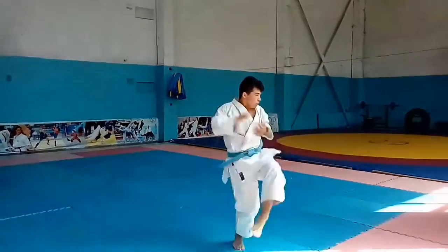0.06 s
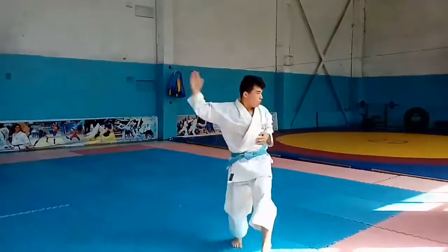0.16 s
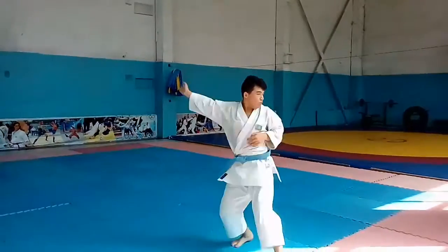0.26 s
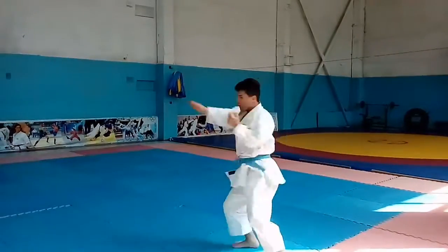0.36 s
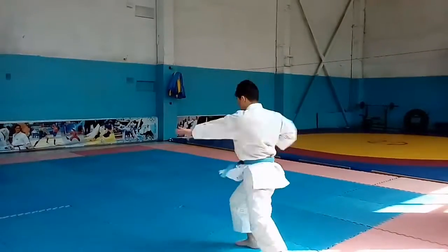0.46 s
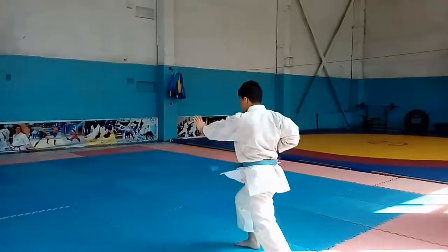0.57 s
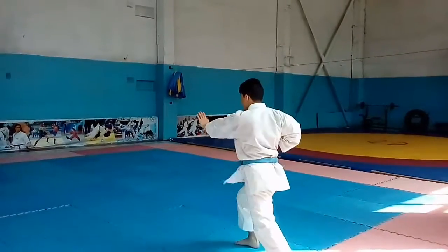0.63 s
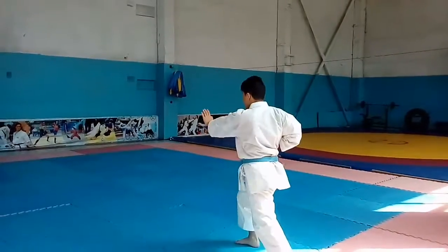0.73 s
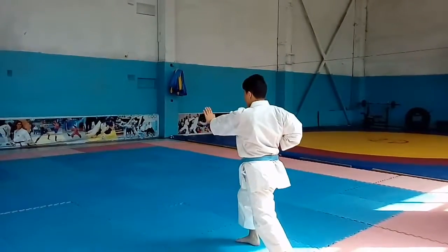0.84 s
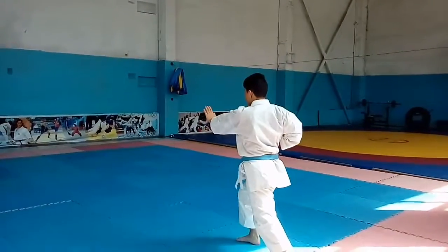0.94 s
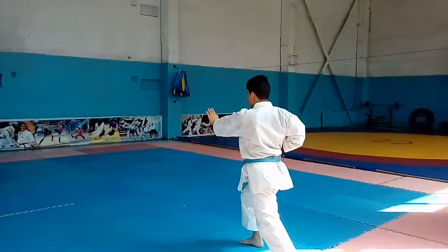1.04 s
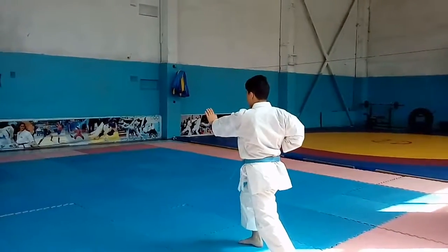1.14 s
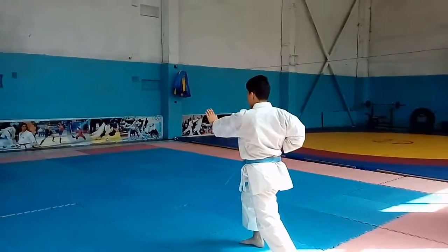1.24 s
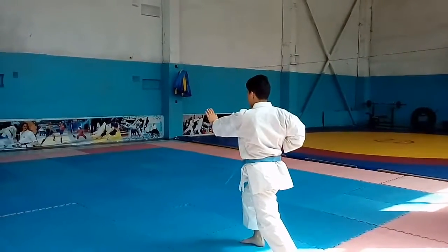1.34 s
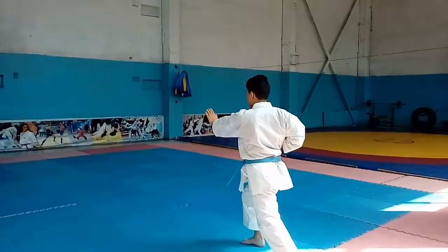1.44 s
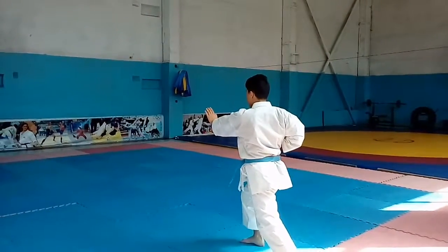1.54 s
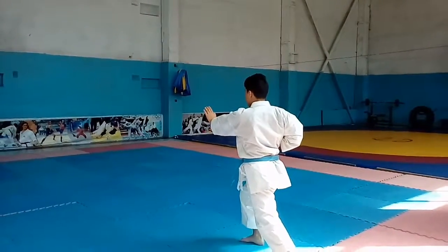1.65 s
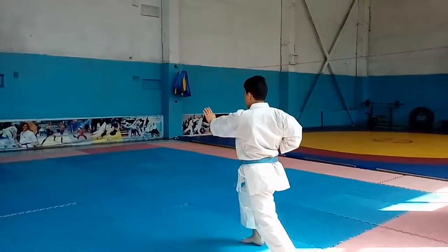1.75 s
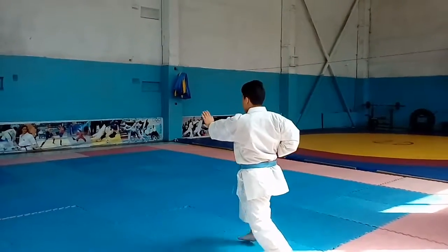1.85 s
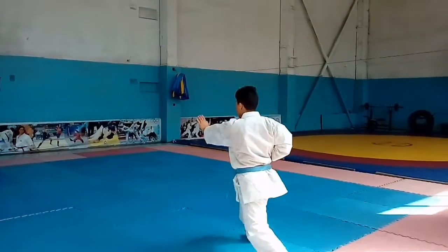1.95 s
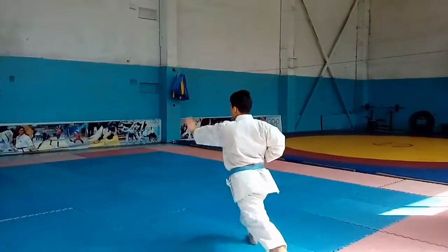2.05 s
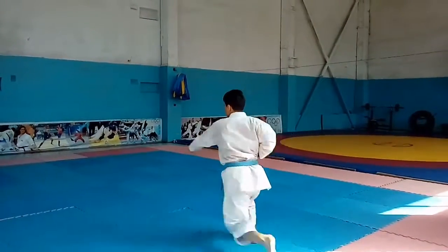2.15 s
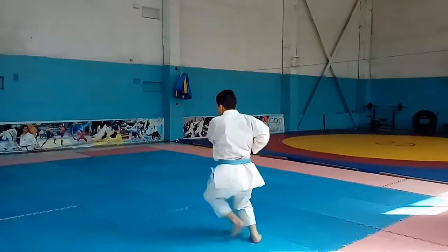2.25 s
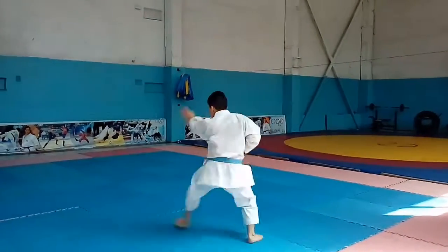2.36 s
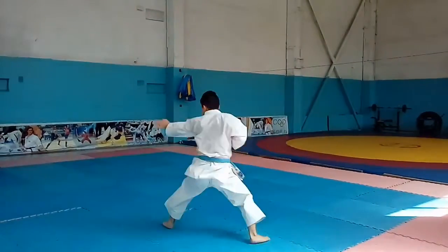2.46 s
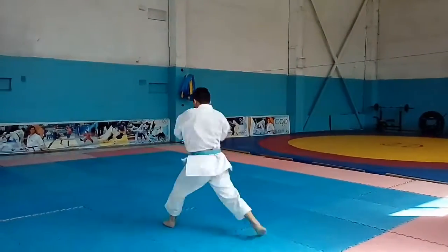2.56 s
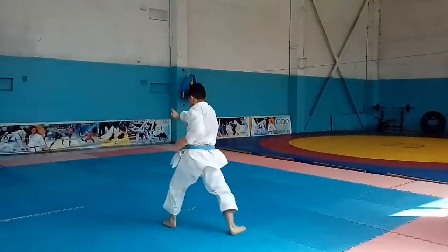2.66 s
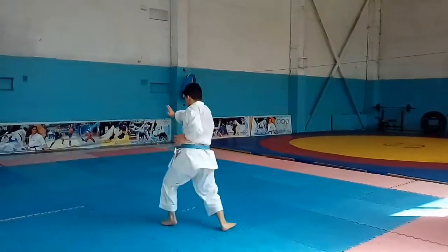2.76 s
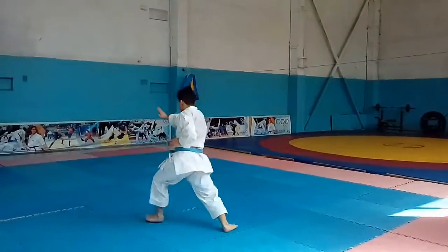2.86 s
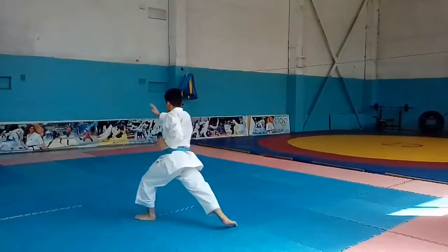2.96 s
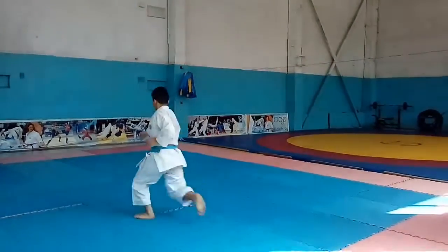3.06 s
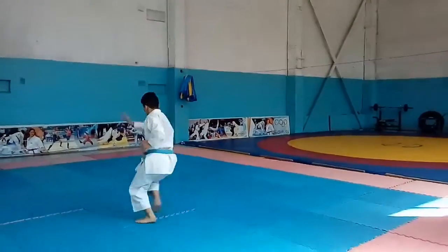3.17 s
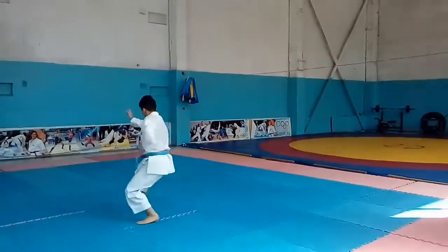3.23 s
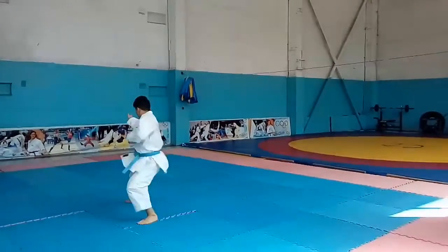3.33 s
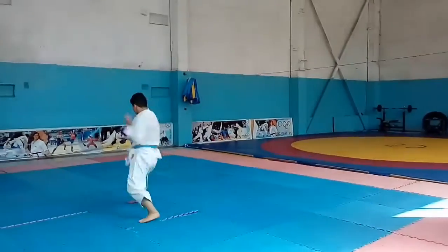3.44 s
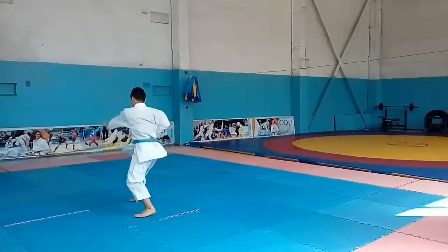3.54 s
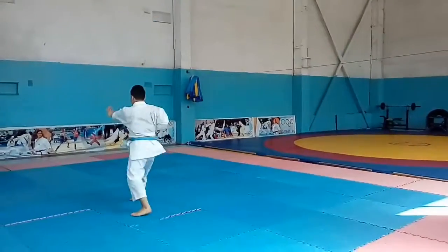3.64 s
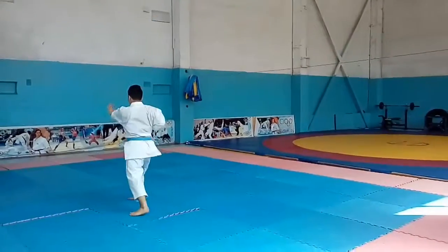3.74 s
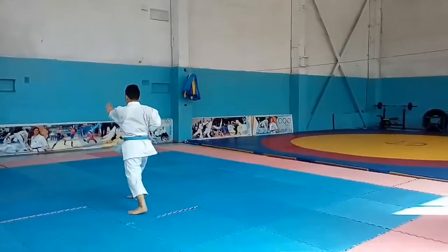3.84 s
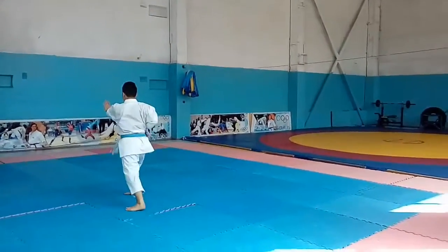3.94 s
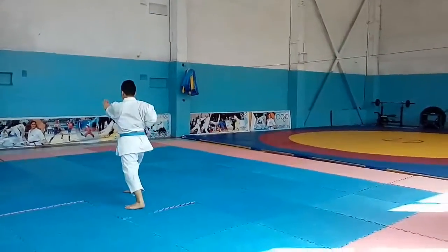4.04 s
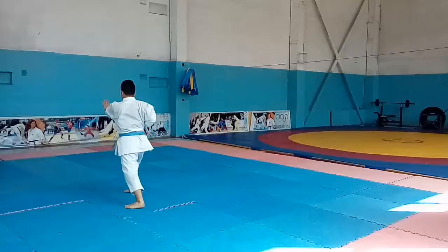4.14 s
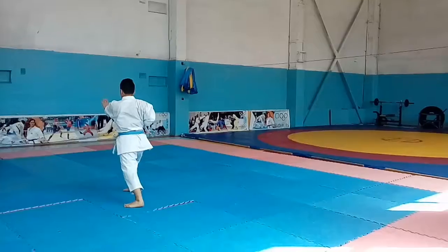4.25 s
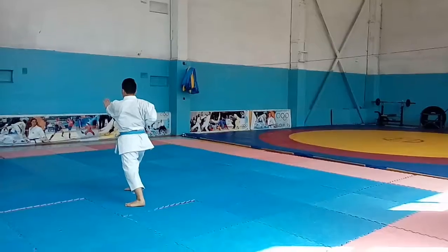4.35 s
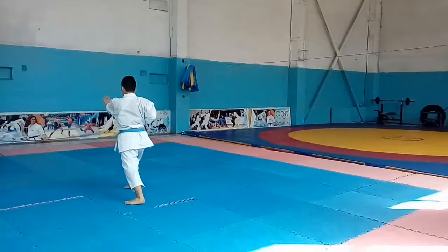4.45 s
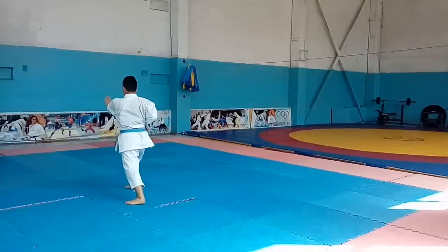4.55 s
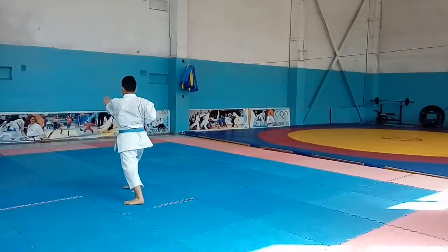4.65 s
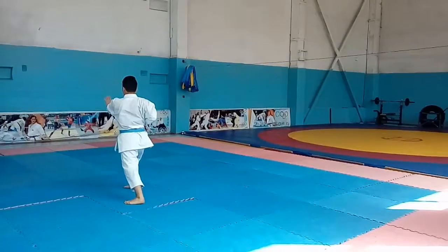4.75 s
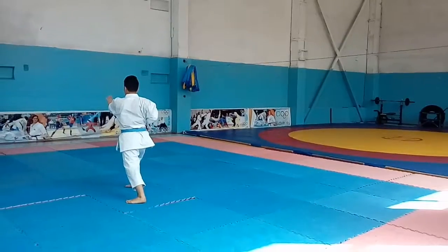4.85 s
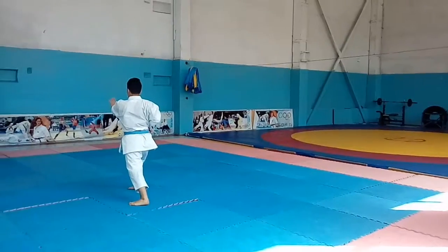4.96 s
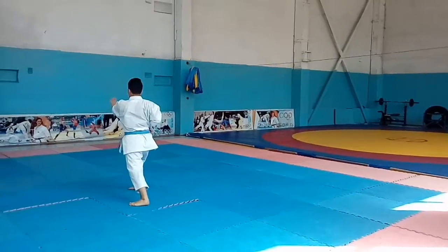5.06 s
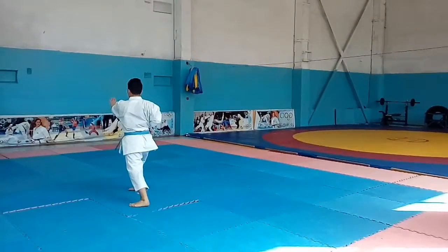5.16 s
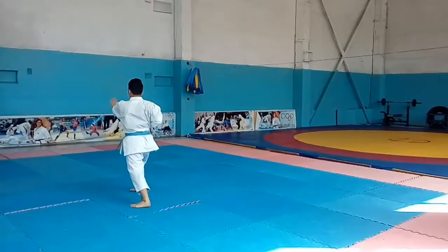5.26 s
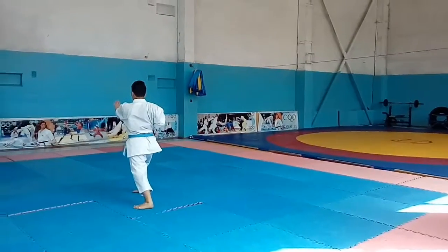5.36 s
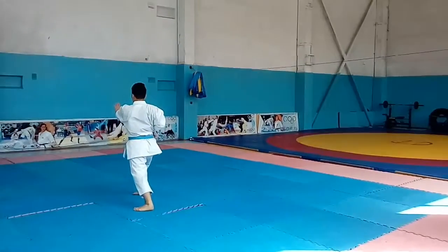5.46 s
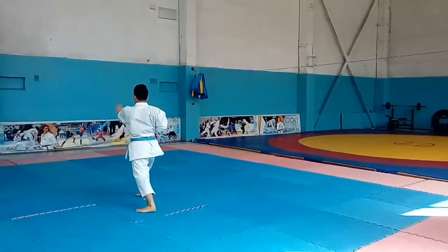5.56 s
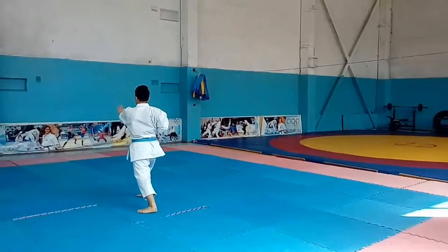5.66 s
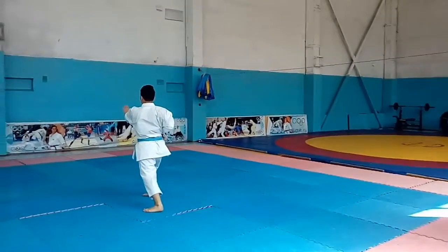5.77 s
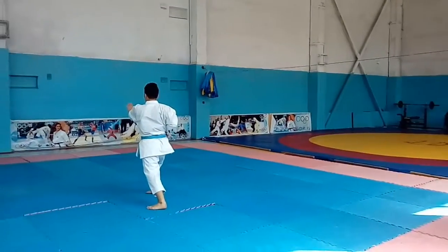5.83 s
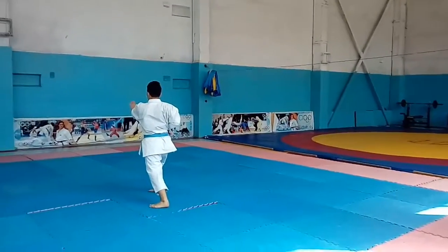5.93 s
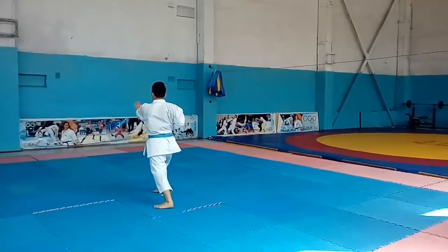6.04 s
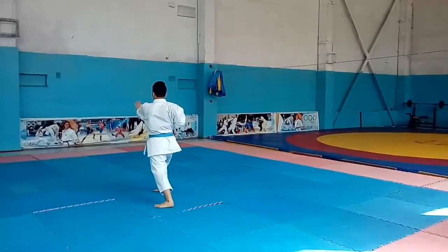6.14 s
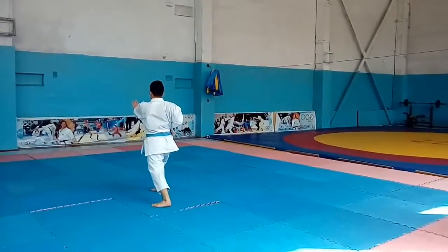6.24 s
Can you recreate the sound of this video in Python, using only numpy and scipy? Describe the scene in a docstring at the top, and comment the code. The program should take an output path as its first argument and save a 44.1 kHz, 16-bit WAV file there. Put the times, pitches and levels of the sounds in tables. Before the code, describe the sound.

Heavy cotton uniform snaps sharply in fast strikes, bare feet thud and skid on foam mats, each crack ringing through a big hard-walled hall.

```python
"""A karateka runs through a form on foam mats in a large, hard-walled sports hall.
The hall still rings at the start as two strikes come quickly; after a pause come steps, skids and a
third strike, then a fourth, and at last only faint swishes. Cotton rubs as shaped noise, snaps taut as short
bursts with an air pop, bare feet thud as low decaying noise and skid as two hiss bands. He faces away, so his
body shades the big snaps; an echo response and a delayed wall bloom throw them back louder and brighter."""
import sys
import numpy as np
from scipy import signal
from scipy.fft import rfft, irfft, next_fast_len
from scipy.io import wavfile
from scipy.ndimage import uniform_filter1d

SR = 44100
rng = np.random.default_rng(int(sys.argv[2]) if len(sys.argv) > 2 else 0)


def store_pcm(level_fs):
    """Save levels as 16-bit WAV."""
    pcm = np.round(np.clip(level_fs, -1, 1) * 32767).astype(np.int16)
    wavfile.write(sys.argv[1], SR, np.atleast_2d(pcm).T)


N = 277830

# spectrum of cloth pulled taut: frequency_hz, density_db (dB per Hz)
CLOTH_SPECTRUM = [(40, -20.5), (150, -15.5), (300, -14.5), (450, -6.5), (600, 3.5), (780, 1), (1000, -3.5),
                  (1500, -2.5), (3000, -6.5), (6700, -7.5), (8000, -20), (11000, -31.5), (16000, -49.5)]
# spectrum of cotton rubbing on cotton: frequency_hz, density_db (dB per Hz)
RUB_SPECTRUM = [(40, -31.5), (200, -25), (400, -8), (520, -1), (620, -1), (800, 3), (1020, -3), (1550, -4),
                (2700, -8), (4200, -9), (6600, -7), (7400, -12.5), (8100, -19.5), (11000, -29),
                (16000, -42.5)]


def amp(db):
    """Amplitude ratio: 20 dB is a factor of ten."""
    return 10 ** (np.asarray(db) / 20)


def unit(x):
    """Normalisation of signal power: scales to rms 1."""
    return x / np.sqrt(np.mean(x ** 2) + 1e-20)


def read(points, hz):
    """Logarithmic frequency scale: interpolates a table along it."""
    f, value = np.transpose(points)
    return np.interp(np.log(hz + 1), np.log(f + 1), value)


def octaves(hz, centre_hz, low_hz, high_hz):
    """Musical interval from the centre in octaves, held level outside the range."""
    return np.log2(np.clip(hz, low_hz, high_hz) / centre_hz)


def slope(hz):
    """Spectral tilt: the octaves over which cloth sounds brighten or dull."""
    return octaves(hz, 1500, 750, 7000)


def colour(x, curve):
    """Linear filtering: weights the spectrum by a dB curve, given as a function of Hz."""
    hz = np.fft.rfftfreq(len(x), 1 / SR)
    return irfft(rfft(x) * amp(curve(hz)), len(x))


def add(mix, s, sound):
    """Superposition: mixes a sound in from time s, in seconds."""
    start = round(s * SR)
    sound = sound[max(-start, 0):]
    part = mix[max(start, 0):][:len(sound)]
    part += sound[:len(part)]


def crackle(count, grain_db):
    """Stick-slip of fibres and creases: noise in tiny grains of uneven loudness."""
    grain_samples = 32
    sizes = np.repeat(rng.standard_normal(count // grain_samples + 1), grain_samples)[:count]
    return unit(rng.standard_normal(count) * amp(grain_db * np.clip(sizes, -2, 2)))


def hiss(size, centre_hz, width):
    """Band-limited friction: grainy noise, 6 dB down at width octaves either side of the centre."""
    def band(hz):
        distance = np.log2((hz + 1) / centre_hz) / width
        return -20 * np.log10(1 + distance ** 2)
    return unit(colour(crackle(size, grain_db=3.5), band))


def smear(t, length):
    """Phase scattering: a short noise burst, evened out so that it holds every frequency equally."""
    z = rfft(rng.standard_normal(len(t)) * np.exp(-(t / length) ** 2))
    return irfft(z / (abs(z) + 1e-20), len(t))


def quiet_air(level_db=-58):
    """Stationary background: steady noise with the spectrum of the quiet hall."""
    # frequency_hz, density_db (dB per Hz)
    air_spectrum = [(20, -9), (60, -6.5), (150, -13.5), (300, -11), (550, -7.5), (1100, -4.5), (2000, -6.5),
                    (3500, -9.5), (6700, -9), (8200, -24.5), (13800, -24.5), (14700, -16.5), (16000, -6)]
    return amp(level_db) * unit(colour(rng.standard_normal(N), lambda hz: read(air_spectrum, hz)))


def hall_tail(build_s=0.046, first_s=0.01):
    """Reverberation: dense reflections build up after a gap, each band dying at its own speed."""
    # decay time of the hall: frequency_hz, t60_s
    decay_times = [(60, 4.05), (160, 2.04), (350, 2.26), (600, 2.86), (1100, 2.13), (1700, 2.96),
                   (2600, 2.79), (4500, 2.49), (6500, 1.74), (8000, 1.32), (10000, 0.6), (15000, 0.37)]
    count = 3 * SR
    hz, t, z = signal.stft(rng.standard_normal(count), SR, nperseg=512)
    fade = amp(-60 * t / read(decay_times, hz)[:, None])
    tail = signal.istft(z * fade, SR)[1][:count]
    tail *= np.clip((np.arange(count) / SR - first_s) / build_s, 0, 1) ** .5
    # mean power gain 1 between 500 and 4500 Hz
    middle = colour(tail, lambda hz: np.where((hz > 500) & (hz < 4500), 0, -200))
    return tail / np.linalg.norm(middle) * np.sqrt(8000 / SR)


def hall(x):
    """Impulse response: convolves with single wall and roof echoes on top of the long tail."""
    # early reflections: delay_s, gain (amplitude ratio)
    early_echoes = [(.034, 0.095), (0.041, 0.063), (.049, 0.11), (0.057, 0.084), (.063, 0.15), (.072, 0.15),
                    (.089, 0.072), (.108, 0.11)]
    response = hall_tail()
    for delay, gain in early_echoes:
        response[round(delay * SR)] += gain
    return signal.fftconvolve(x, response)[:N]


def lingering(level_db=-33, tilt=-1):
    """Free decay: the hall is still ringing from the strike before; tilt in dB/octave."""
    late_tail = hall_tail()[SR // 4:]
    tail = colour(late_tail, lambda hz: read(CLOTH_SPECTRUM, hz) + tilt * octaves(hz, 1500, 500, 7000))
    out = np.zeros(N)
    # the level is that of the first tenth of a second
    add(out, 0, amp(level_db) * tail[:2 * SR] / np.std(tail[:SR // 10]))
    return out


def whooshes(size=16384, width_octaves=.28):
    """Narrow-band noise under a Gaussian envelope: whooshes and thin flicks of loose cloth."""
    # peak_s, level_db, half_length_s, centre_hz
    whoosh_table = [(2.291, -55, .03, 13400), (3.175, -63, 0.011, 14200), (3.69, -35.5, .024, 1180),
                    (4.937, -56.5, 0.063, 1205), (5.728, -67, 0.063, 3200)]
    out, t = np.zeros(N), (np.arange(size) - size // 2) / SR
    for s, db, length, centre_hz in whoosh_table:
        swell = np.exp(-(t / length) ** 2)
        add(out, s + t[0], amp(db) * hiss(size, centre_hz, width_octaves) * swell)
    return out


def skids(size=16384):
    """Sliding friction: bare skin dragging over the embossed foam hisses in two narrow bands."""
    # peak_s, level_db, half_length_s, upper_over_lower_db
    skid_table = [(1.971, -45.5, 0.052, 2), (2.133, -43.5, 0.053, 0.5), (2.207, -43.5, 0.056, -12.5),
                  (2.27, -40, .028, 8), (2.567, -39, 0.066, 0), (2.641, -45.5, 0.017, 16),
                  (2.718, -38.5, 0.042, 8.5), (3.426, -40.5, 0.011, 16.5)]
    # lower and upper hiss band of skin on foam: centre_hz, width_octaves
    sole_bands = [(3270, 0.22), (5900, 0.24)]
    out, t = np.zeros(N), (np.arange(size) - size // 2) / SR
    for s, db, length, upper_db in skid_table:
        lower, upper = [hiss(size, *band) for band in sole_bands]
        swell = np.exp(-(t / length) ** 2)
        add(out, s + t[0], amp(db) * unit(lower + amp(upper_db) * upper) * swell)
    return out


def steps(attack_s=0.0071):
    """Impact excitation: a heel pushes the mat and the floor under it booms briefly."""
    # feet landing: start_s, level_db, decay_s, tilt_db_per_octave
    step_table = [(0.02, -44.5, 0.032, 8), (0.169, -52, 0.092, 3), (0.421, -35.5, 0.038, 10),
                  (0.649, -51, 0.067, 1), (2.149, -47.5, 0.021, 4), (2.293, -48.5, 0.059, 12),
                  (2.599, -46.5, 0.09, -3.5), (2.738, -41, 0.024, 1), (2.828, -34, 0.079, -9.5),
                  (3.491, -45, 0.088, 6.5), (3.678, -49, 0.028, -5)]
    # spectrum of the struck mat: frequency_hz, density_db (dB per Hz)
    mat_spectrum = [(20, -19.5), (35, -13.5), (48, -16.5), (60, -14), (75, 2.5), (95, -6), (135, -7.5),
                    (200, -19), (400, -22), (1500, -50.5), (6000, -76)]
    out, t = np.zeros(N), np.arange(SR // 2) / SR
    for s, db, decay, tilt in step_table:
        thud = colour(rng.standard_normal(len(t)),
                      lambda hz: read(mat_spectrum, hz) + tilt * octaves(hz, 80, 40, 160))
        shape = (1 - np.exp(-t / attack_s)) * np.exp(-t / decay)
        add(out, s, amp(db) * unit(thud * shape) * np.sqrt(np.mean(shape ** 2)))
    return out


def boom(x, boom_hz=75, t60_s=1.5, boom_db=-3):
    """Modal resonance: steps set the wooden floor under the mats humming at one low pitch."""
    t = np.arange(2 * SR) / SR
    mode = np.sin(2 * np.pi * boom_hz * t) * np.exp(-np.log(1000) * t / t60_s)
    hum = signal.fftconvolve(x, mode / np.linalg.norm(mode))[:N]
    # the level refers to input noise 50 Hz wide
    return amp(boom_db) * hum * np.sqrt(100 / SR)


def sweeps(t):
    """Speed-dependent friction: level (dB) and tilt at times t; sweeps are brightest at top speed."""
    # limbs sweeping through jacket and trousers: top_speed_s, level_db, half_length_s, tilt_db_per_octave
    sweep_table = [ (0.01, -41, 0.12, 4.5), (0.099, -31, .035, 0), (0.447, -34.5, 0.046, -0.5),
                   (0.602, -28.5, 0.085, 2), (1.955, -47, 0.037, 3.5), (2.151, -38.5, 0.048, 3),
                   (2.266, -34, 0.045, 4), (2.452, -43.5, 0.089, -1.5), (2.553, -38, 0.073, 1.5),
                   (2.716, -35, 0.0296, -2), (3.172, -33, 0.02, 1), (3.432, -37.5, 0.044, 1.5),
                   (3.542, -31.5, 0.031, 1), (3.663, -33, 0.15, -1), (4.69, -59, 0.12, 4.5),
                   (4.925, -54, 0.13, 1.5), (5.719, -63, 0.032, -0.5)]
    roundness = 1.5
    dulling = 0.62  # dB/octave of brightness lost one half-length from top speed
    s, db, length, tilt = np.transpose(sweep_table)[:, :, None]
    away = abs(t - s) / length
    power = (amp(db) * np.exp(-away ** roundness)) ** 2 + 1e-16
    level = 10 * np.log10(power.sum(0))
    return level, np.average(tilt - dulling * np.minimum(away, 2), axis=0, weights=power)


def swish():
    """Dry friction: cotton rubs on cotton, and faster rubbing is louder and brighter."""
    hz, t, z = signal.stft(crackle(N, grain_db=2.5), SR, nperseg=512)
    db, tilt = sweeps(t)
    gain = amp(read(RUB_SPECTRUM, hz)[:, None] + octaves(hz, 1500, 550, 7800)[:, None] * tilt)
    # equal power in every frame, so that tilt leaves the level alone
    rub = signal.istft(z * gain / np.sqrt(np.mean(gain ** 2, 0)), SR)[1][:N]
    # folds make the level waver by 1.1 dB rms
    folds_db = 1.1 * unit(uniform_filter1d(rng.standard_normal(N), size=400))
    return rub * amp(np.interp(np.arange(N) / SR, t, db) + folds_db)


def snaps(size=8192):
    """Impulsive radiation: a noise burst and a hollow pop of the air under the cloth, as (direct, thrown).
    Weak snaps hardly pop; thrown is what goes into the hall."""
    # cloth pulled taut: peak_s, level_db, half_length_s, tilt_db_per_octave
    snap_table = [ (0.047, -36, 0.003, 19), (.105, -27.5, 0.01, -7), (0.121, -25, 0.0059, 4),
                  (0.147, -29.5, 0.0026, 0.5), (0.1715, -18, 0.0012, 12), (0.176, -18, 0.0065, -0.5),
                  (0.1835, -13, 0.0019, 2), (0.2836, -17.5, 0.0013, -5), (0.4127, -15, 0.0016, -3),
                  (0.422, -26.5, 0.0043, 3), (0.584, -25.5, 0.00079, -15), (0.592, -17, 0.0022, -5),
                  (0.5967, -16, 0.0026, 0.5), (1.943, -45.5, 0.0026, 19.5), (1.989, -30, 0.0016, 4.5),
                  (2.145, -30.5, 0.003, 3.5), (2.18, -31.5, 0.0076, 0.5), (2.3067, -26.5, 0.0055, 0.5),
                  (2.593, -31, 0.0043, 0), (2.634, -24, 0.0031, -2), (2.644, -30, 0.01, 2.5),
                  (2.744, -17.5, 0.0035, -3), (2.7522, -16, 0.0059, -2), (3.501, -26.5, 0.0058, 0),
                  (3.602, -27.5, 0.0022, 2.5), (3.6829, -16, 0.0037, -2)]
    pop_db = -6  # over the burst, for an untilted snap of full_pop_db or more
    full_pop_db, pop_growth = -17, .5  # below that level, dB of pop lost per dB of snap
    lowest_pop_hz, pop_decay_s = 720, 0.00188
    sheen = 5  # dB/octave above 8 kHz
    hall_db, hall_tilt = -2.5, -0.65  # share that the hall returns; dB/octave
    direct, thrown = np.zeros((2, N))
    t = (np.arange(size) - size // 2) / SR
    for s, db, length, tilt in snap_table:
        shape = np.exp(-abs(t / length))
        energy = np.sqrt(np.mean(shape ** 2))
        burst = shape * unit(rng.standard_normal(size))
        # the short direct path keeps the top treble
        near = unit(colour(burst, lambda hz: read(CLOTH_SPECTRUM, hz) + tilt * slope(hz)
                           + sheen * octaves(hz, 8000, 7960, 16000)))
        age = np.maximum(t + pop_decay_s, 0)
        pitch_hz = lowest_pop_hz * rng.uniform(1.0, 1.1)
        pop = unit(np.sin(2 * np.pi * pitch_hz * age) * age * np.exp(-age / pop_decay_s))
        pop_gain = amp(pop_db - 2 * tilt + pop_growth * min(db - full_pop_db, 0))
        add(direct, s + t[0], amp(db) * energy * unit(near + pop_gain * pop))
        # the cloth radiates differently each way, so the hall receives a smeared blend
        blend = smear(t, length + 0.0076)
        far = colour(blend, lambda hz: read(CLOTH_SPECTRUM, hz) + hall_tilt * slope(hz))
        add(thrown, s + t[0], amp(db + hall_db) * energy * unit(far))
    return direct, thrown


def strikes(size=32768, crack_s=0.0099):
    """Directivity: the open sleeve throws its crack away from the microphone, as (wall, thrown).
    The far wall returns a bright, scattered bloom; thrown goes into the hall."""
    # arm thrusts at the far wall: strike_s, thrown_db, tilt_db_per_octave, ring_db, bloom_db, bloom_rise_s
    strike_table = [(0.177, -18, -1, -2.5, -33.5, 0.041), (0.594, -14.5, 0, 3, -24.5, 0.064),
                    (2.748, -13.5, -0.14, -2.5, -24.5, 0.086), (3.682, -12.5, -1, 15.5, -25, 0.045)]
    # resonances of the hollow sleeve: centre_hz, width_hz, share (of ring_db)
    sleeve_modes = [(1630, 95, .85), (1980, 130, .5), (2450, 380, .65), (3550, 300, 0.2), (4670, 390, 0.45),
                    (582, 70, 0.35)]
    wall_delay_s, bloom_fade_s = 0.013, 0.12  # first return from the far wall, and its decay
    bloom_tilt = 1  # dB/octave on top of the strike's own tilt
    wall, thrown = np.zeros((2, N))
    t = (np.arange(size) - size // 8) / SR

    def ring(hz):
        """Cavity resonance: the sum of the sleeve's peaks."""
        return sum(share * np.exp(-((hz - f) / width) ** 2) for f, width, share in sleeve_modes)

    for s, db, tilt, ring_db, bloom_db, rise in strike_table:
        crack = colour(smear(t, crack_s),
                       lambda hz: read(CLOTH_SPECTRUM, hz) + tilt * slope(hz) + ring_db * ring(hz))
        add(thrown, s + t[0], amp(db) * unit(crack) * np.sqrt(crack_s * SR / size))
        scatter = unit(colour(crackle(size, grain_db=2.5),
                              lambda hz: read(RUB_SPECTRUM, hz) + (bloom_tilt + tilt) * slope(hz)
                              + .5 * ring_db * ring(hz)))
        bloom = np.clip((t - wall_delay_s) / (rise - wall_delay_s), 0, 1) ** .5
        bloom *= np.exp(-np.maximum(t - rise, 0) / bloom_fade_s)
        add(wall, s + t[0], scatter * amp(bloom_db) * bloom)
    return wall, thrown


def scene(rub_hall_db=-0.86, feet_hall_db=-3):
    """Direct and reverberant fields: jacket and feet, their echo, and the quiet air of the hall."""
    direct, spread = snaps()
    wall, thrown = strikes()
    rub = swish() + skids() + whooshes()
    feet = steps()
    echo = hall(spread + thrown + wall + amp(rub_hall_db) * rub + amp(feet_hall_db) * feet)
    return (direct + wall + rub + feet + boom(feet) + echo + lingering() + quiet_air())[None]


def suppress(x, threshold_db=-74, depth_db=7, knee_db=11.5):
    """Spectral noise suppression: turns down every band that sinks towards the floor."""
    z = signal.stft(x, SR, nperseg=1024, noverlap=768)[2]
    # power averaged over neighbouring bands, then over time
    power = uniform_filter1d(abs(z) ** 2, size=5, axis=0)
    power = uniform_filter1d(power, size=7, axis=1)
    level_db = 10 * np.log10(abs(power) + 1e-20)
    quiet = .5 - .5 * np.tanh((level_db - threshold_db) / knee_db)
    return signal.istft(z * amp(-depth_db * quiet), SR, nperseg=1024, noverlap=768)[1][:N]


def record(dry, notch_hz=210, notch_width_hz=42, notch_db=-13, edge_hz=15750):
    """Transducer response: a hollow in the low mids, then noise suppression and the band limit."""
    padded = np.pad(dry[0], (0, next_fast_len(N + SR) - N))
    heard = colour(padded, lambda hz: notch_db * np.exp(-((hz - notch_hz) / notch_width_hz) ** 2))[:N]
    low_pass = signal.firwin(511, edge_hz, window=("kaiser", 9), fs=SR)
    return signal.oaconvolve(suppress(heard), low_pass, "same")[None]


dry = scene()
out = record(dry)
store_pcm(out)
```